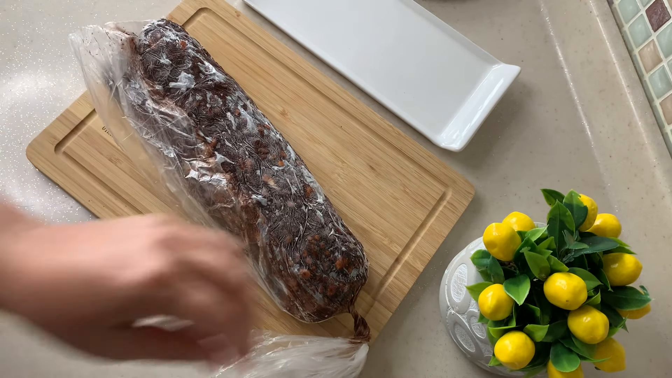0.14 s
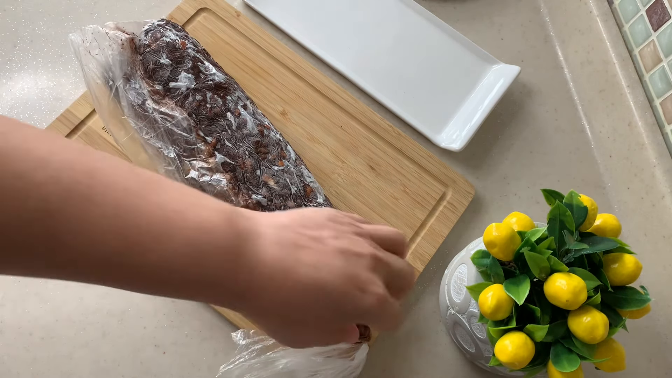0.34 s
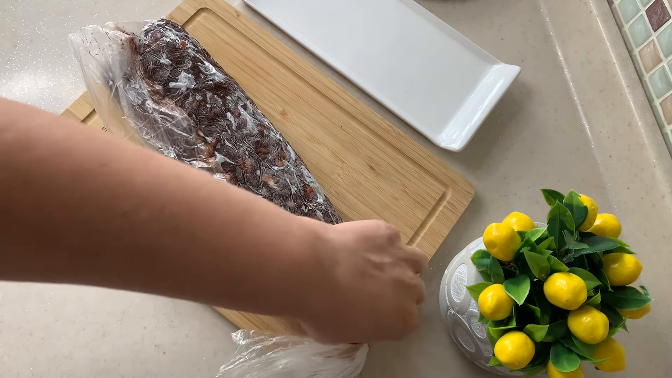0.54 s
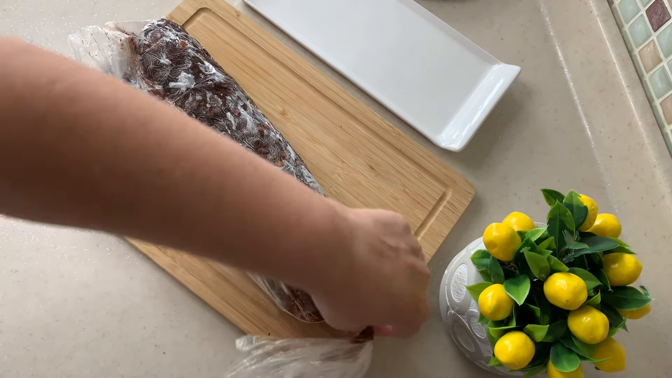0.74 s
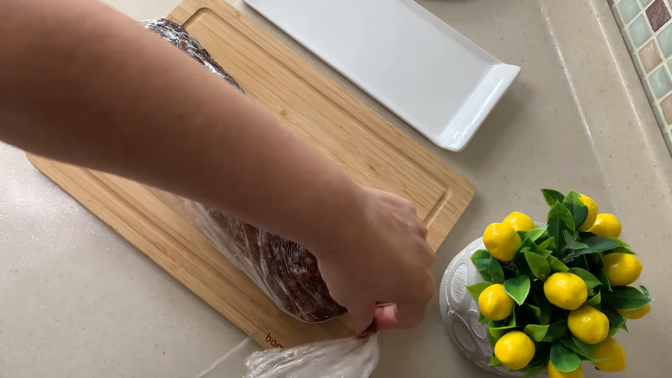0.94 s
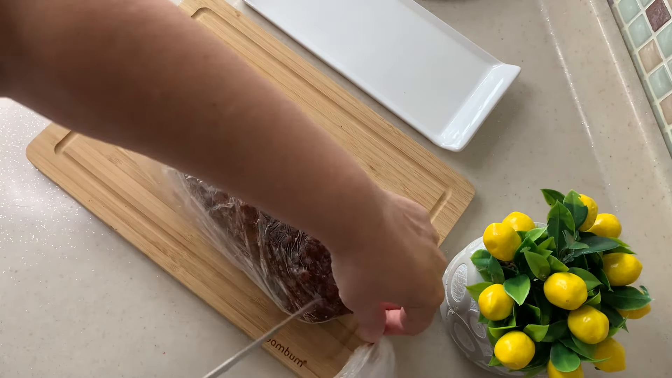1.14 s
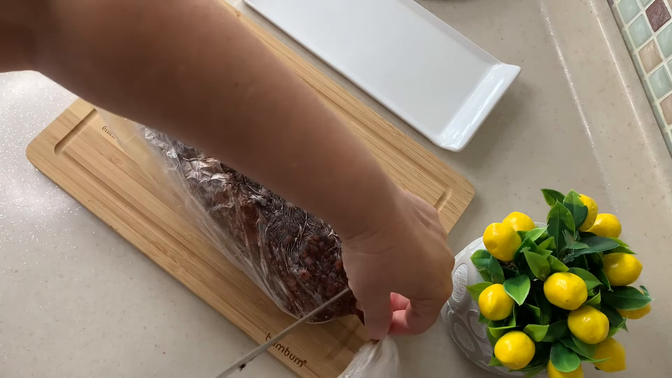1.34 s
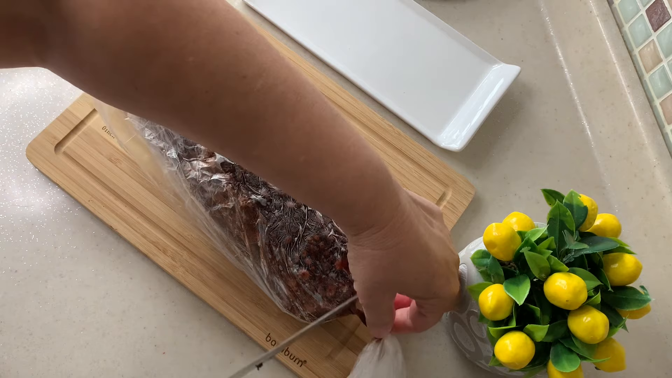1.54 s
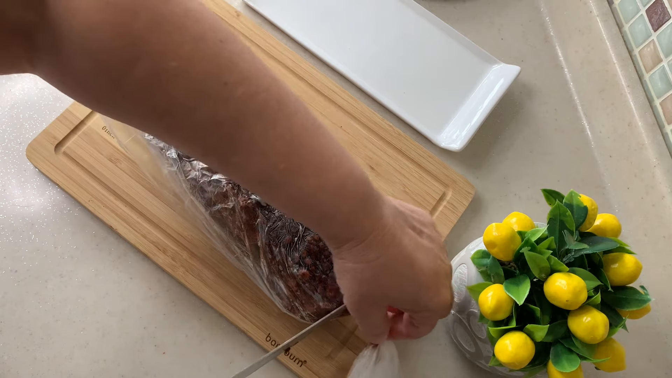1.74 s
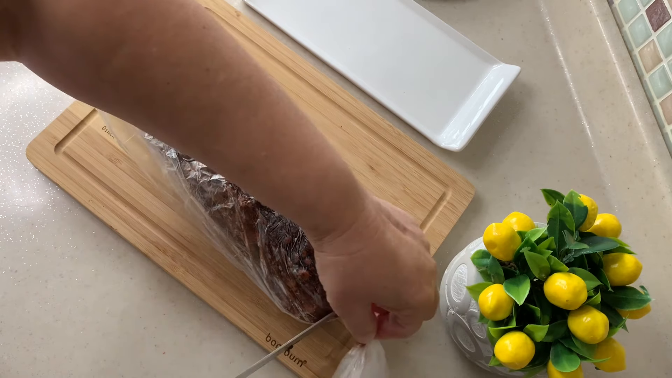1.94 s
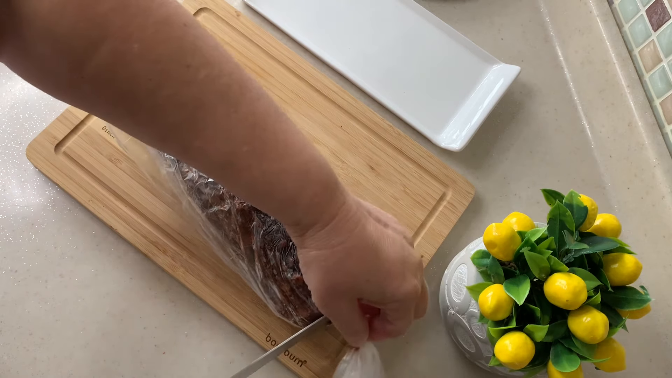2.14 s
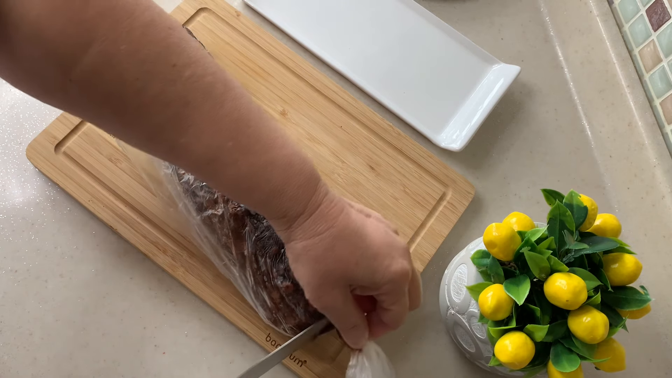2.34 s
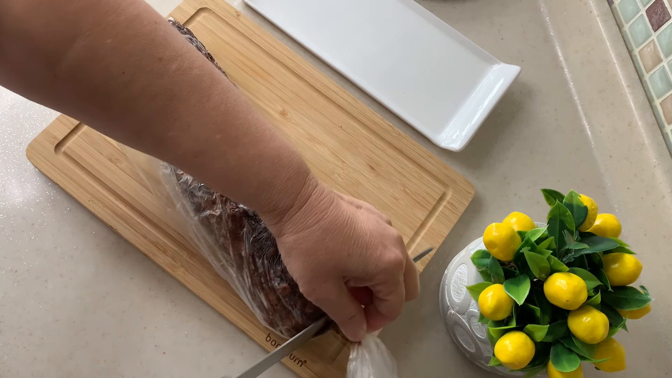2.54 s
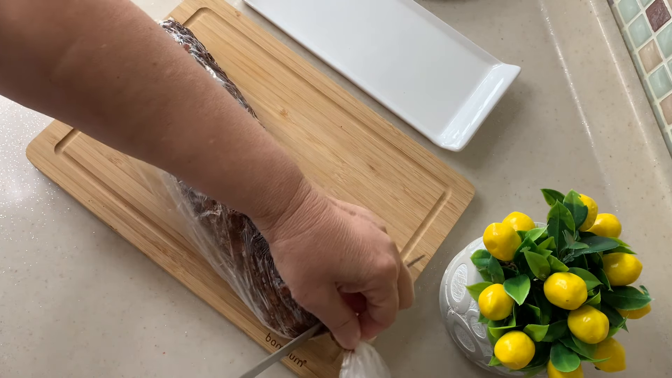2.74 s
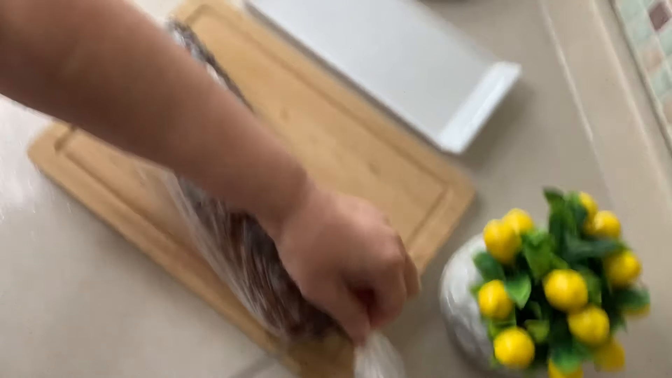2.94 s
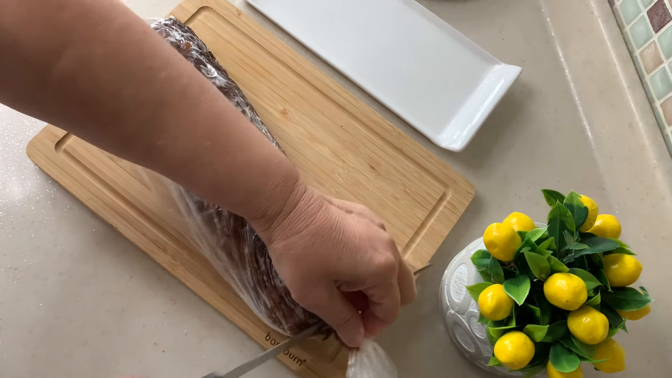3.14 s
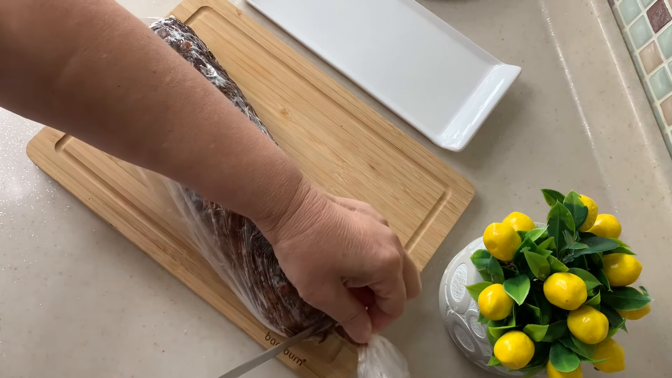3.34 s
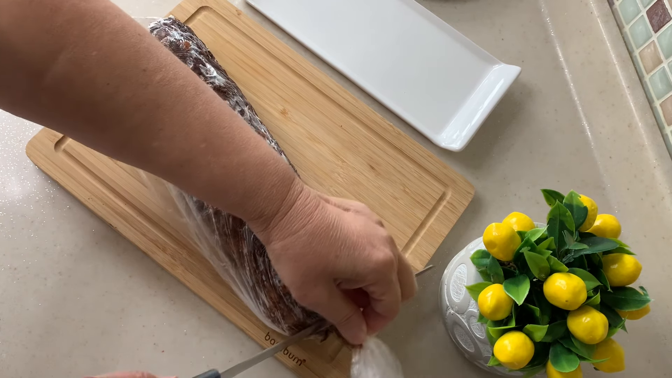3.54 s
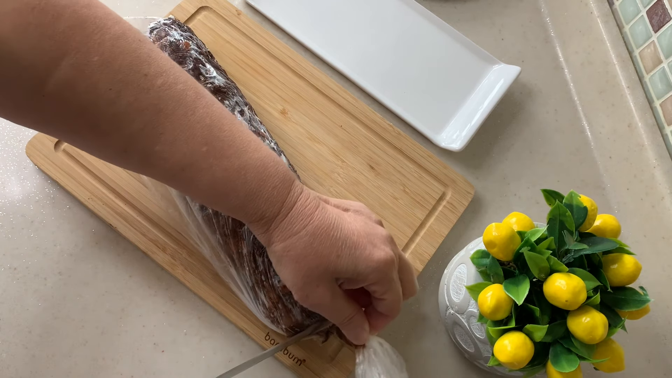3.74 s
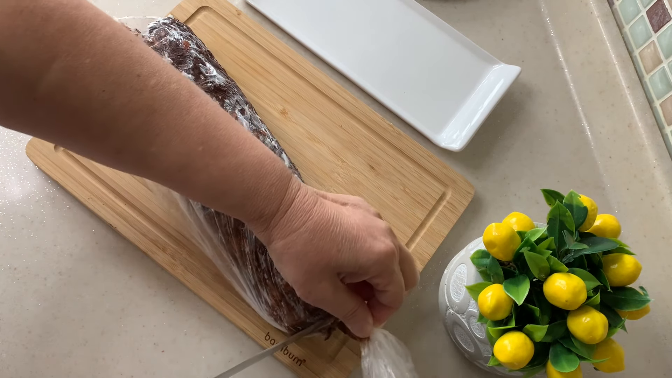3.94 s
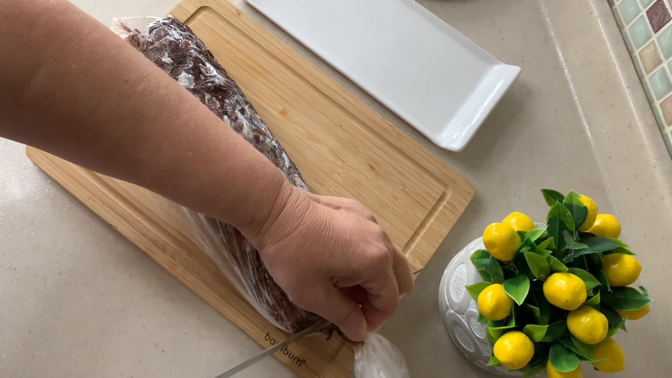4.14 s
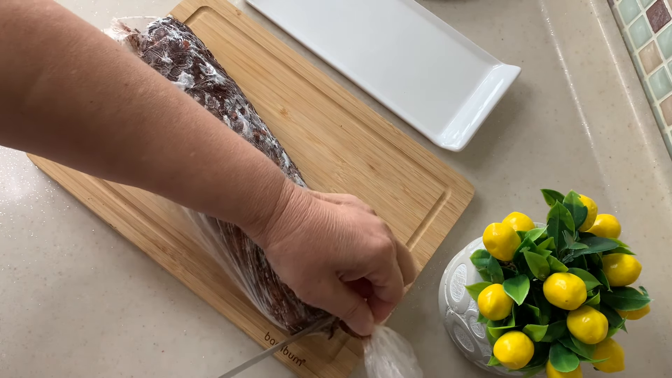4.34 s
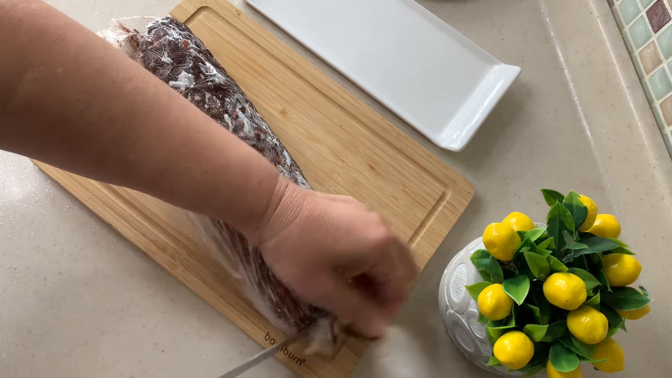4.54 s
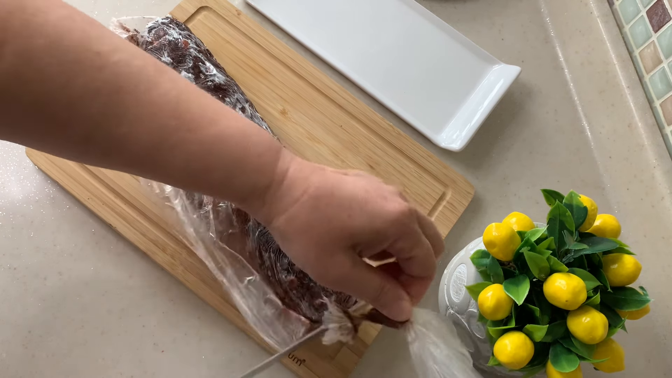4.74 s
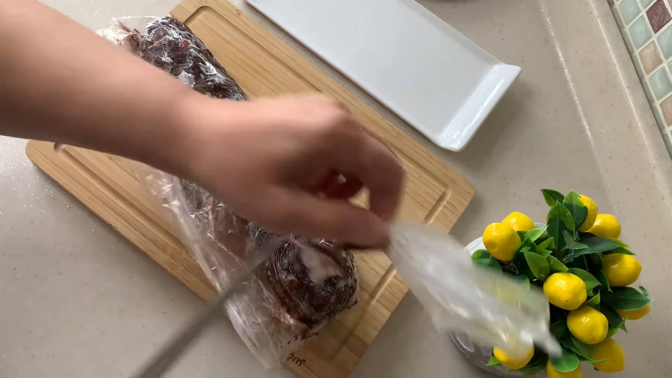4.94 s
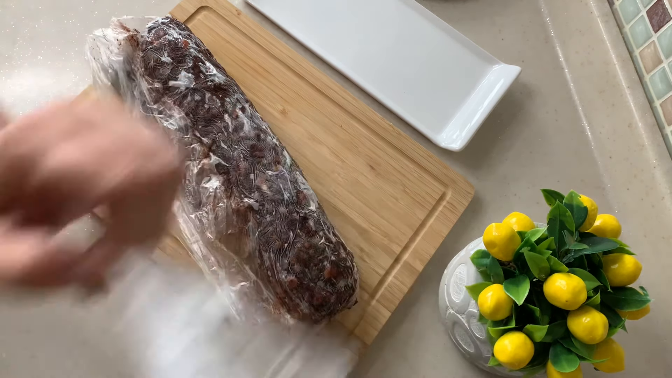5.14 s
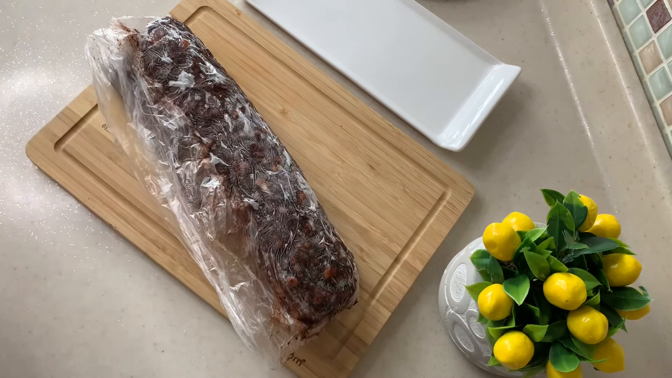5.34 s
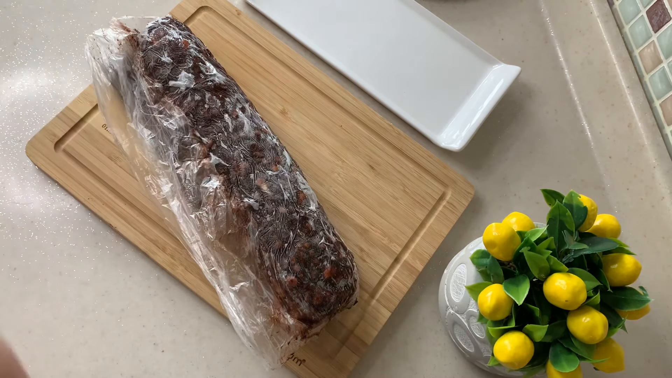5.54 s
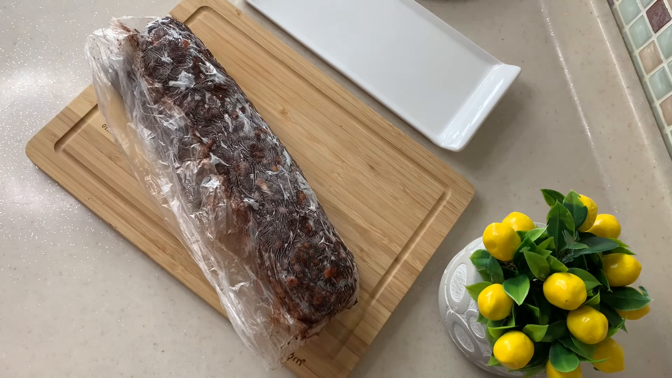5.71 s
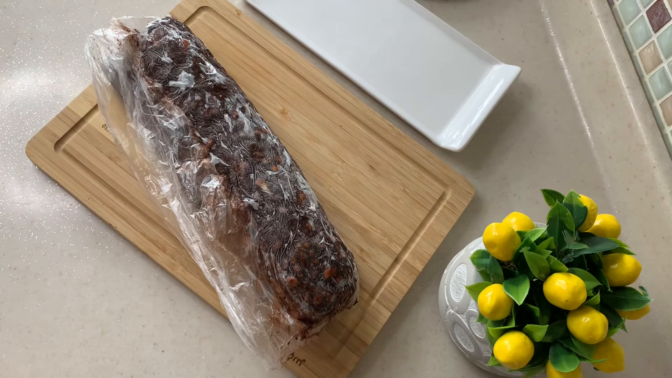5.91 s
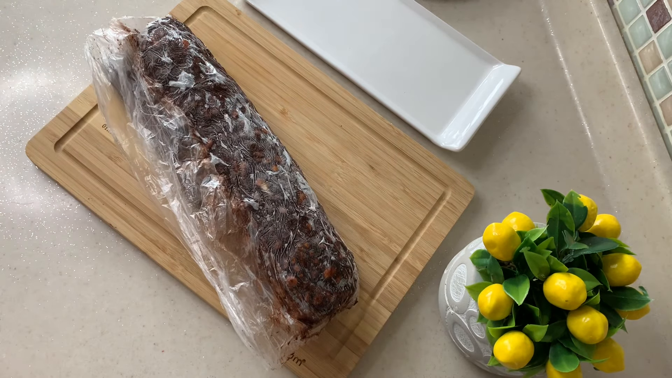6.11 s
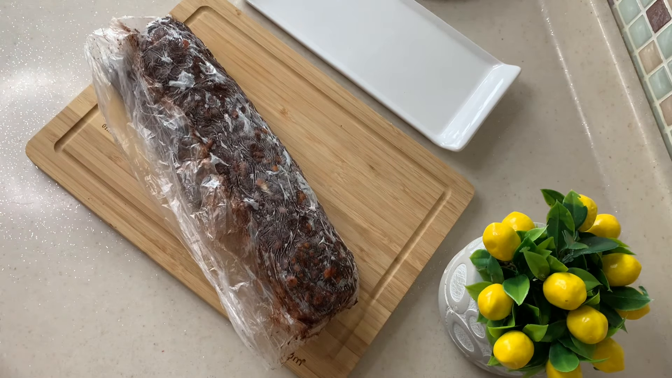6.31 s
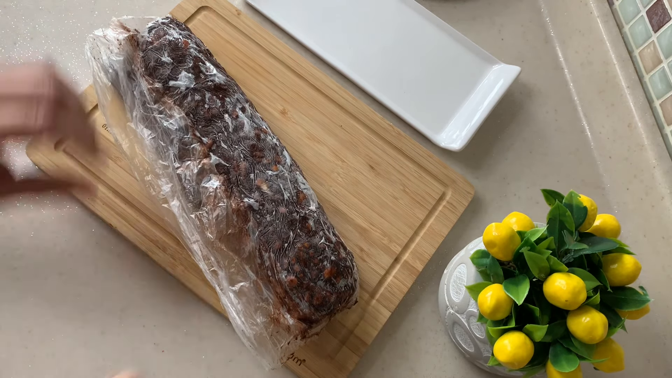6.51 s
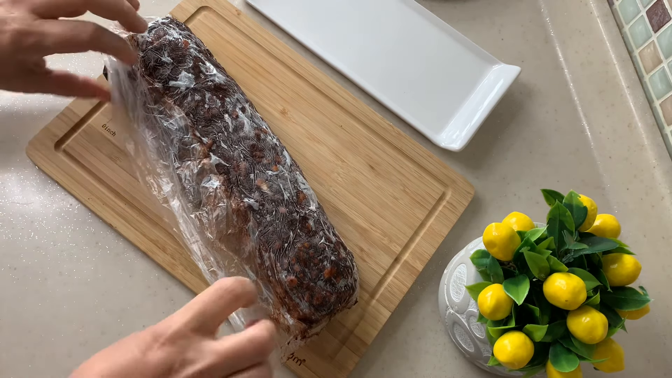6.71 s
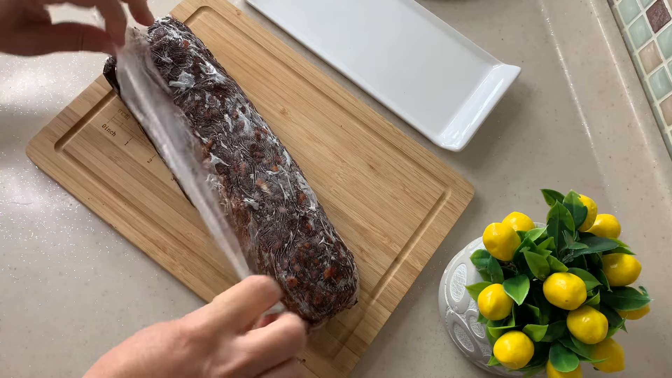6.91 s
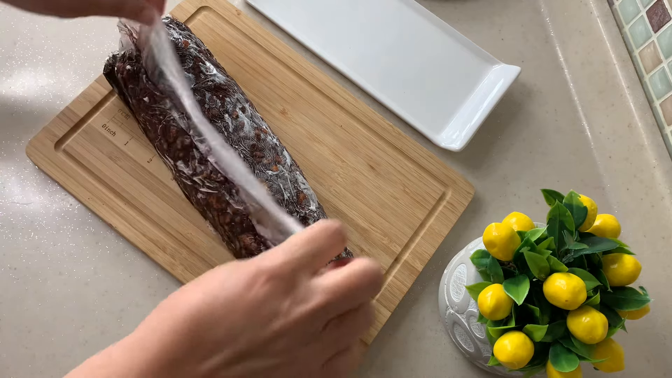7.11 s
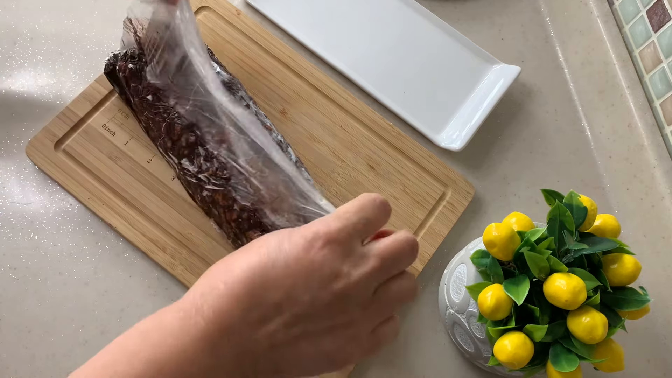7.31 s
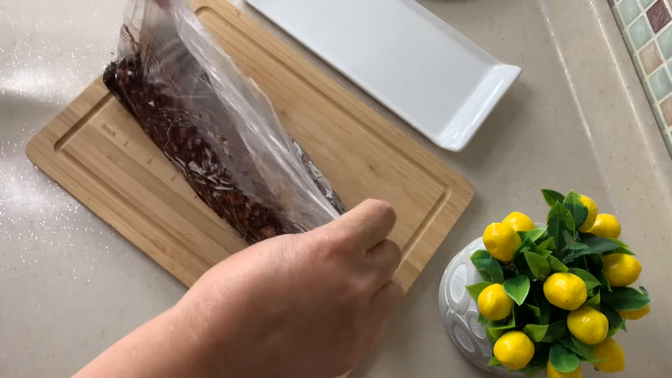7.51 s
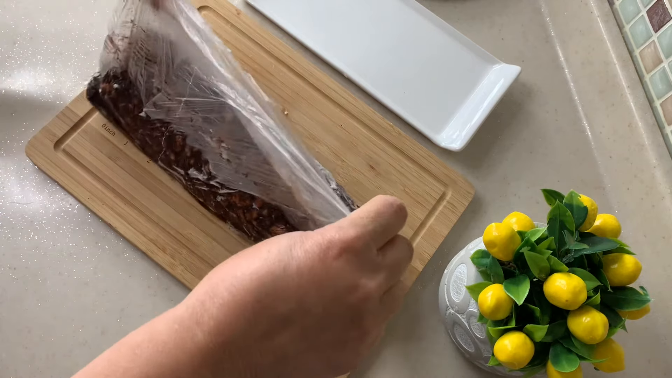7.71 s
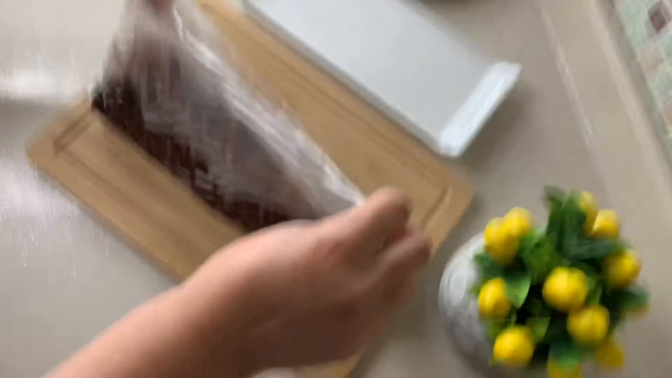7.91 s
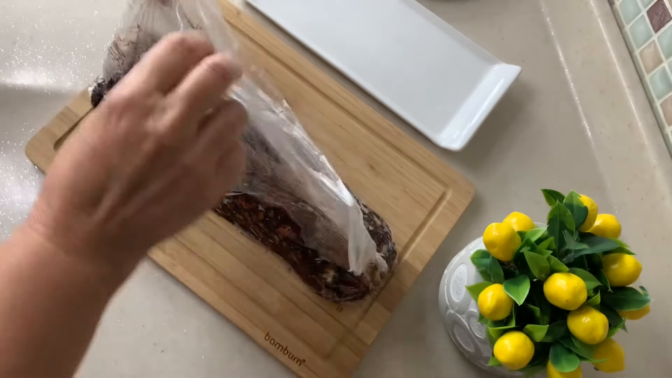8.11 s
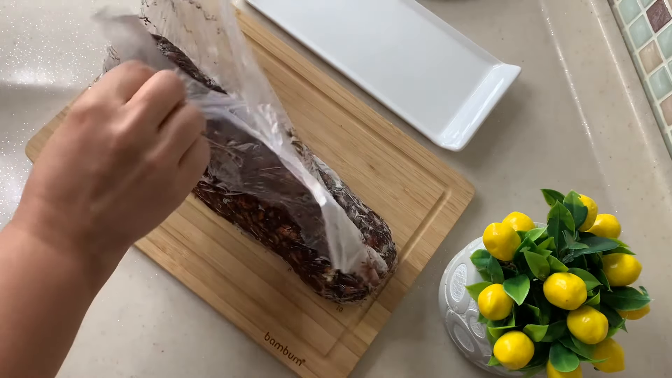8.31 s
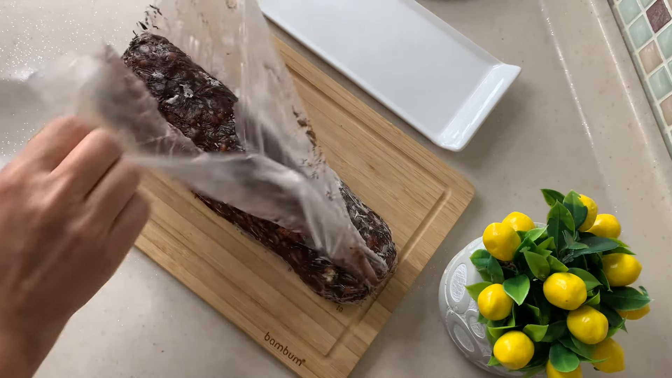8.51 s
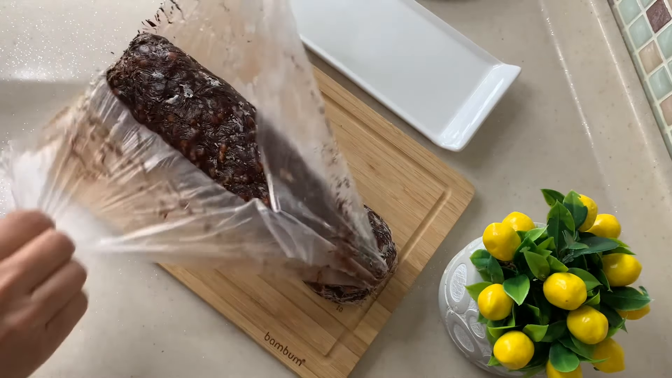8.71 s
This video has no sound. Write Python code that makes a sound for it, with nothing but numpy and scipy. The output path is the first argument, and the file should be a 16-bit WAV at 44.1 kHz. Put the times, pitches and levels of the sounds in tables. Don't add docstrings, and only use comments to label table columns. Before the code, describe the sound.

A small tiled kitchen with a soft, low ventilation hum throughout, captured close in stereo by a phone; hard walls give each sound a short tail. From 0 to 2 seconds fingers gather plastic film with faint, thin crinkles and tiny ticks. From about 2.2 to 4.5 a knife saws to and fro, roughly six soft crackly strokes a second, with dry snaps and a light board knock near 2.9. At 4.55 the blade breaks through and hits the wood with a hard, bright, ringing knock, then slight rustles until 5.3. Steel clinks on stone at 5.8 and more heavily at 6.05, with dull handle knocks and smaller settling clinks up to 6.46. From 6.7 film peels in uneven tugs, bright and much louder, dense crackle with sharp snaps, strongest around 7.0-7.9, low board thumps near 7.4 and 7.9, a brief dip near 8, then renewed crackling to the end.

```python
import sys
import numpy as np
from scipy import signal
from scipy.fft import rfft, irfft, next_fast_len
from scipy.io import wavfile
from scipy.ndimage import uniform_filter1d

SR = 44100
rng = np.random.default_rng(int(sys.argv[2]) if len(sys.argv) > 2 else 0)


def file_out(sig):
    cols = np.atleast_2d(sig).T
    lim = np.clip(cols, -1, 1)
    pcm = np.round(lim * 32767).astype(np.int16)
    wavfile.write(sys.argv[1], SR, pcm)


def undo_db(level):
    steps = np.asarray(level, float) / 20
    return 10 ** steps


N = 390715

# pitch_hz, level_db
AIR_SPECTRUM = [(30, -22.5), (70, 2), (130, 2.5), (260, -16.5), (600, -11.5), (1100, -13), (2000, -23.5),
                (3000, -25), (3700, -36.5), (7000, -40), (16000, -34.5)]
# pitch_hz, width_hz, level_db
DUCT_TONES = [(72, 20, -63), (204, 9.1, -63.5), (328, 25, -69), (411, 47, -67), (397, 12, -69),
              (584, 14, -68), (640, 99, -67)]
# start_s, length_s, level_db
GRIPS = [(-.06, 0.1, -66.5), (.07, 0.11, -64.5), (.345, 0.04, -58.5), (.55, 0.076, -64), (.66, 0.17, -59.5),
         (.97, 0.12, -59.5), (1.12, 0.11, -67.5), (1.32, 0.053, -71), (1.41, 0.062, -71.5),
         (1.6, 0.023, -72), (1.66, 0.06, -74.5), (1.78, 0.027, -66), (1.84, 0.15, -59.5), (1.99, 0.11, -56),
         (4.65, 0.087, -47.5), (4.77, 0.11, -47.5), (5.03, 0.072, -65), (5.14, 0.1, -71),
         (5.28, 0.094, -71)]
# start_s, length_s, level_db
STROKES = [(2.18, 0.093, -58), (2.25, 0.28, -54.5), (2.5, .17, -56.5), (2.66, 0.21, -51),
           (2.88, 0.14, -47.5), (3.07, 0.12, -48.5), (3.22, 0.18, -52.5), (3.385, 0.15, -50.5),
           (3.55, 0.16, -49.5), (3.71, 0.13, -51), (3.89, 0.11, -52.5), (4.03, 0.14, -52.5),
           (4.21, 0.14, -50.5), (4.35, 0.12, -50.5), (4.47, 0.16, -42.5)]
# start_s, length_s, level_db
SCUFFS = [
    (4.585, 0.29, -57.5),
    (5.45, 1, -82),
    (6.205, 0.032, -53),
    (6.3, .1, -72),
]
# start_s, length_s, level_db
PULLS = [(6.65, 0.058, -69.5), (6.72, 0.12, -48.5), (6.8, 0.27, -39), (7.08, 0.14, -36),
         (7.22, 0.15, -33.5), (7.33, 0.2, -38), (7.56, 0.058, -37), (7.62, 0.067, -36), (7.7, 0.1, -39),
         (7.86, 0.1, -42.5), (7.95, 0.16, -56), (8.155, 0.1, -41), (8.29, 0.11, -38.5), (8.4, 0.18, -33),
         (8.55, 0.26, -33), (8.7, 0.37, -39.5)]
# middle_db, low_db, lean (under 1 peaks early), steepness, overlap
GRIP_SWELL = (-2.5, -11, 1.82, 1, 0.74)
STROKE_SWELL = (-0.5, -7, 1.02, 1.92, 0.25)
PULL_SWELL = (-4, -8, 1.39, 0.84, 0.3066)
SCUFF_SWELL = (15.5, 4.5, 0.35, 1.5, 0.017)
# pitch_hz, level_db
CREASE_SPECTRUM = [(190, -10.5), (350, -5.5), (700, -5.5), (1400, -8.5), (2200, -6.5), (3500, -3),
                   (5500, -1.5), (7000, -5), (9000, 7), (12000, 2), (15500, 4)]
# start_s, peak_db, middle_db (relative)
HANDLING_SNAPS = [(1.359, -47, -6), (1.385, -48, -20), (1.484, -50, -20), (1.62, -50, -14), (1.6616, -50, -7),
                  (1.705, -50, -10), (2.197, -40, -20), (1.8517, -41.5, -20), (1.9604, -50, 8),
                  (5.0636, -43.5, -18), (5.0974, -40, -13.5), (5.0252, -50.5, -15), (5.0513, -47.5, -13.5),
                  (5.0686, -40, -18), (5.076, -44.5, -20), (5.117, -46.5, -20), (5.127, -51.5, -19.5),
                  (5.1819, -46, -20), (5.31, -47, -20), (5.2107, -47.5, -19.5), (5.303, -43.5, -13),
                  (5.7407, -37, -9), (6.333, -50, -12), (6.345, -52, -12), (6.357, -52, -20),
                  (6.368, -49, -20), (6.6705, -43.5, -9.5), (6.699, -41.5, -11), (.1491, -50, -12),
                  (.3661, -46, -12), (.6095, -51, -13), (.6374, -50, -16), (.844, -45, -16),
                  (1.0186, -49, -12), (1.1513, -49, -19), (1.9874, -45, -13), (2.0158, -43, -15),
                  (2.0712, -45, -9), (4.9972, -49, -18), (5.0377, -50, -18), (5.1117, -50, -20),
                  (5.1529, -52, -19), (5.1763, -50, -18), (5.2162, -48, -19), (5.2382, -53, -16),
                  (5.4173, -56, -12),
                  (0.3706, -40.5, -12), (1.076, -40, -8), (1.2012, -44, -16), (1.2613, -44, -23),
                 (1.4217, -46, -16), (1.7982, -43, -10.5), (2.0966, -38, -3), (2.317, -38, -16),
                 (2.379, -35, -5), (2.7237, -33, -3), (2.833, -34, -9), (2.9325, -34, -15),
                 (2.9864, -33.5, -22), (3.021, -30.5, -28), (3.12, -43, -7), (3.266, -43, -16),
                 (3.4018, -26.5, -17), (3.6326, -39, -19), (3.7305, -34.5, -25), (4.5186, -39.5, 13)]
# start_s, peak_db, middle_db (relative)
PEELING_SNAPS = [(6.76, -28.5, -7), (6.7759, -26, -21), (6.8767, -24, -17), (7.0245, -19.5, -14),
                 (7.0489, -22.5, -24), (7.1119, -13, -19), (7.146, -21.5, -25), (7.2551, -22, -18),
                 (7.2786, -16, -18), (7.294, -10, -20), (7.2905, -16, -22), (7.3347, -26.5, -18),
                 (7.359, -23, -23), (7.397, -22, -1.5), (7.66, -21, -20), (7.726, -25, -21),
                 (7.8296, -26, -20), (7.9017, -32.5, -20), (8.135, -44, -18), (8.1678, -30, -23),
                 (8.394, -22, -22), (8.438, -27.5, -23), (8.556, -20, -20), (8.568, -18, -18),
                 (8.583, -18, -16), (8.6524, -23, -20), (8.7195, -27, -16), (8.758, -21, -17),
                 (8.833, -20, -20), (7.4113, -17.5, -9.5), (7.5915, -15, -25), (7.594, -14, -20),
                 (7.6435, -25, -25), (7.647, -20, -25), (7.645, -20.5, -32), (7.7023, -26, -32),
                 (7.7475, -19, -20), (7.772, -23.5, -31), (7.7979, -21, -14), (7.8418, -18.5, -16),
                 (8.1575, -38, -18), (8.5053, -15, -23), (6.7273, -39, -14), (7.012, -26, -8),
                 (7.6015, -21, -20), (7.6745, -21, -20), (7.737, -22, -19), (7.8019, -16, -23),
                 (7.812, -25, -20), (8.2082, -26, -17), (8.315, -28, -16), (8.481, -21, -18),
                 (8.5095, -20, -20), (8.526, -21, -20), (8.576, -19, -18), (8.633, -23, -18)]
# start_s, peak_db, brightness_db
CHOPS = [(0.371, -47, 4), (2.9333, -30, -11.5), (2.985, -46, -8.5), (3.011, -43, -20), (4.546, -40, 11.5),
         (4.5505, -31, 15), (4.5545, -21, 10), (4.558, -12.5, 8.5), (4.5613, -18.5, -19),
         (4.5657, -19.5, 1), (4.5701, -18.5, -10), (7.022, -30.5, 8.5), (7.1117, -26.5, 10),
         (7.5903, -35, -18), (7.663, -35.5, -15)]
# pitch_hz, level_db, t60_s
BOARD_MODES = [(146, 21.5, 0.28), (187.6, -21.5, 0.17), (348, 3, 0.14), (435, -3, 0.23), (691, 10.5, 0.068),
               (1001, 0, 0.073), (1300, -15.5, 0.023), (1780, -8.5, 0.027), (2073, -2.5, 0.09),
               (2592, 11, 0.14), (3420, -7, 0.12), (4485, -18.5, 0.047), (6530, -38, 0.018)]
# start_s, peak_db, pitch_hz, t60_s
THUMPS = [(2.9523, -41, 76, 0.32), (2.9668, -32.5, 76, 0.19), (2.995, -45, 77, 0.25),
          (3.0065, -32, 76, 0.18), (4.564, -50, 108, 0.31), (4.564, -17, 185, 0.04),
          (6.055, -46, 110, 0.69), (6.056, -35, 328, 0.052), (6.2, -36.5, 61.5, 0.12),
          (6.31, -44, 57.3, 0.74), (6.999, -49, 111, 0.14), (7.429, -22, 83.4, 0.1),
          (7.484, -31.5, 72, 0.13), (7.903, -23, 126.3, 0.14), (7.922, -15, 58.4, 0.098),
          (7.99, -24, 50.4, 0.04), (8.62, -43, 62, 0.28), (8.75, -48, 55.4, 0.17), (8.03, -35, 70, 0.39)]
# start_s, peak_db,
# pitch_hz, t60_s
KNOCKS = [(0.38, -44, 316, 0.1), (2.9333, -28, 1700, 0.014), (2.9335, -29, 2600, 0.014),
          (2.942, -38, 940, .015), (2.983, -42, 2500, 0.018), (3.011, -36, 2400, 0.012),
          (4.561, -35, 11900, .1), (4.5617, -18.5, 1600, 0.018), (3.008, -34.5, 400, 0.036),
          (4.56, -21, 1044, 0.06), (4.563, -30, 484, 0.055), (4.565, -27, 1300, .05),
          (4.572, -27, 1965, .06), (4.558, -19.5, 2450, .04), (4.564, -24, 4700, 0.057),
          (6.052, -34.5, 560, 0.067), (4.7, -40, 330, .1), (4.5615, -9, 3600, 0.018),
          (4.562, -35, 314, 0.18), (6.076, -32, 349, 0.2), (6.213, -33.5, 310, 0.081),
          (6.33, -37, 434, .05), (6.345, -41, 250, 0.089), (6.409, -38, 530, .05),
          (6.426, -45, 1500, 0.025), (7.596, -32.5, 360, 0.07), (7.665, -42, 440, .05),
          (6.248, -38, 380, 0.11), (7.295, -40, 600, 0.1), (6.404, -41, 1100, .04),
          (6.447, -32.5, 760, 0.06), (6.3313, -46, 3470, 0.02), (6.452, -35, 1900, 0.038),
          (5.8, -39, 2300, .06), (5.796, -43, 1600, .04), (5.832, -41, 1700, .05), (6.396, -43, 1500, .04),
          (6.3925, -28.5, 750, 0.04), (6.3941, -42, 3300, .015), (6.3945, -44, 6600, .015),
          (6.4036, -40, 6560, .018), (6.404, -43, 3400, .025), (6.4, -34, 900, .04),
          (0.372, -50, 560, 0.062), (7.36, -40, 620, .08), (7.12, -35, 590, .07)]
# start_s, peak_db, knock_db (relative), blade_share (0 tip - 1 handle end)
CLINKS = [(5.7946, -12, -26, 0.01), (5.8021, -13.5, -28, .01), (5.81, -29, -11, .05),
          (5.853, -31, -12, .05), (5.8306, -17, -17.5, 0.049), (6.0212, -36, -8, 0.5),
          (6.042, -38.5, 13, 0.88), (6.0466, -11.5, -14.5, 1), (6.0508, -9.5, -21, 1),
          (6.0543, -12.5, -30, 0.57), (6.065, -17, -18, 0.87), (6.0687, -18, -20, 0.35),
          (6.0795, -19.5, -18, 0.69), (6.096, -29.5, -15, 0.56), (6.2088, -46, 7, 0.34),
          (6.215, -38, 2, .4), (6.221, -57, 11, 0.42), (6.335, -46, 3, 0.62), (6.3932, -42, 7, 0.47),
          (6.4038, -35, 3, 0.21), (6.4505, -22, -3, 0.99), (6.455, -18, -9.5, 0.81), (6.463, -24, -10, .9)]
# pitch_hz, level_db, t60_s
TIP_MODES = [(2568, 7.5, 0.05), (2960, 7, 0.051), (3460, 10.5, 0.049), (4114, 12, 0.077), (5800, -3, 0.06),
             (6330, -3.5, .05), (9850, 13.5, 0.08), (11900, -4, 0.065), (11000, 12, 0.06), (12550, 7, 0.07),
             (15400, -3, 0.06), (15640, -8.5, 0.044)]
# pitch_hz, level_db, t60_s
BLADE_MODES = [(1760, 3, 0.06), (2840, -3.5, 0.074), (4210, 4, 0.1), (3710, 0, 0.06), (5000, -5, 0.06),
               (5670, 6, 0.07), (6000, 3, .06), (6730, 8.5, 0.063), (9860, 12, 0.086), (10400, 8.5, 0.088),
               (12900, 11.5, 0.14), (11800, 17, 0.062), (14500, 2, 0.07), (14800, 8.5, 0.064)]
# pitch_hz, t60_s
KITCHEN_DECAY = [(100, 0.64), (500, 0.44), (1500, 1), (4000, 0.52), (9000, 0.42), (16000, 0.28)]
# pitch_hz, likeness (0 - 1)
LIKENESS = [(60, .9), (200, .8), (400, .3), (1800, .1), (4500, .12), (7000, .5), (7800, .985), (16000, .97)]
# pitch_hz, likeness (0 - 1)
PEELING_LIKENESS = [(60, .9), (200, .8), (400, .3), (1800, .3), (2800, .44), (4500, .15), (7000, .5),
                    (7800, .975), (16000, .96)]
# pitch_hz, lag_cycles
LEFT_LAG = [(0, -.14), (500, -.3), (1200, .1), (2800, .5), (4200, 1), (5200, 1.5), (6500, 2), (7400, 2.31),
            (8500, 2.5), (11100, 3), (13400, 3.5), (15900, 4)]
# pitch_hz, level_db
BALANCE = [(100, -2), (400, 0.5), (1200, 1), (3500, -1), (5600, -6.5), (6800, 2.5), (16000, .3)]
PHONE_LIMITS = [45, 16050]


def evened(x):
    return x / np.sqrt(np.mean(x ** 2) + 1e-20)


def read(points, hz):
    f, value = np.transpose(points)
    return np.interp(np.log(hz + 1), np.log(f + 1), value)


def add(mix, s, sound):
    part = mix[round(s * SR):][:len(sound)]
    part += sound[:len(part)]


def band(x, lo_hz, hi_hz):
    return signal.sosfilt(signal.butter(2, [lo_hz, hi_hz], "bandpass", fs=SR, output="sos"), x)


def puff(t60, rise_s, count=1):
    t = np.arange(1500) / SR
    envelope = undo_db(-60 * t / t60) * (1 - np.exp(-t / rise_s))
    return np.squeeze(rng.standard_normal((count, len(t))) * envelope)


def chatter(count, length):
    noise = rng.standard_normal((count, length))
    waver = evened(uniform_filter1d(uniform_filter1d(noise, 50, 1), 50, 1))
    return 1 + .9 * waver * np.minimum(np.arange(length) / 200, 1)


def ring(modes, detune, longest_s):
    t = np.arange(SR // 11) / SR
    hz, db, t60 = np.transpose(modes)[:, :, None]
    level_luck, pitch_luck, phase = rng.standard_normal((3, len(modes), 1))
    fading = undo_db(db + 3 * level_luck - 60 * t / np.clip(t60, .005, longest_s))
    tones = np.sin(2 * np.pi * hz * (1 + detune * pitch_luck) * t + phase)
    out = (fading * chatter(len(modes), len(t)) * tones).sum(0)
    return out / abs(out).max()


def air():
    frames, hz = N // 512 + 5, np.fft.rfftfreq(2048, 1 / SR)
    a, b, c, d, patches = rng.standard_normal((frames, 1025, 5)).T
    patches = evened(uniform_filter1d(uniform_filter1d(patches, 12, 0), 8, 1))
    shape = undo_db(read(AIR_SPECTRUM, hz))
    shape *= undo_db(-55) / np.linalg.norm(shape)
    for f, width, db in DUCT_TONES:
        line = 1 / (1 + (2 * (hz - f) / width) ** 2)
        shape = np.hypot(shape, undo_db(db) * line / np.linalg.norm(line))
    z = np.array([a + 1j * b, c + 1j * d]) * (shape[:, None] * undo_db(1.9 * patches))
    noise = signal.istft(z, nperseg=2048, noverlap=1536)[1][:, :N]
    return np.linalg.norm(shape) * evened(noise)


def handling():
    t = np.arange(0, N, 32) / SR
    power = np.full((3, len(t)), 1e-12)
    movements = ((GRIPS, GRIP_SWELL), (STROKES, STROKE_SWELL), (PULLS, PULL_SWELL), (SCUFFS, SCUFF_SWELL))
    for moves, (middle_db, low_db, lean, steep, overlap) in movements:
        for start, length, db in moves:
            u = ((t - start) / length + overlap) / (1 + 2 * overlap)
            on = (u > 0) & (u < 1)
            speed = np.sin(np.pi * u[on] ** lean) ** max(steep, 1)
            power[:, on] += (speed * undo_db(db + np.array([[0], [middle_db], [low_db]]))) ** 2
    return [np.interp(np.arange(N) / SR, t, 10 * np.log10(p)) for p in power]


def drift(depth_db):
    knots = undo_db(depth_db * rng.standard_normal(N // 3500 + 2))
    return np.interp(np.arange(N) / 3500, np.arange(len(knots)), knots)


def film():
    out = np.zeros(N)
    high_db, middle_db, low_db = handling()
    high, middle, low = undo_db(high_db), undo_db(middle_db), undo_db(low_db)
    clumps_db = sum(1.1 * evened(uniform_filter1d(rng.standard_normal(N), size)) for size in (160, 900))
    pops = np.zeros(N)
    pops[rng.integers(0, N, 2500)] = undo_db(3.85 * np.minimum(rng.exponential(1, 2500), 4) - 1.0)
    pops *= undo_db(-.35 * np.clip(high_db + 62, 0, 30))
    for hz in np.geomspace(190, 15500, num=24):
        cycles = np.arange(int(6 * SR / hz) + 12) * hz / SR
        grain = np.sin(2 * np.pi * cycles) * cycles * np.exp(-cycles / 1.09)
        train = np.zeros(N)
        sizes = undo_db(3.0 * np.minimum(rng.exponential(1, 16000), 5))
        train[rng.integers(0, N, 16000)] = sizes * rng.choice([-1., 1.], 16000)
        flips = evened(signal.oaconvolve(train + pops, grain)[:N])
        swell = high if hz > 7000 else middle if hz > 1600 else low
        out += flips * undo_db(read(CREASE_SPECTRUM, hz) - 6.5) * drift(1.0) * swell
    return out * evened(undo_db(clumps_db))


def snaps():
    out = np.zeros(N)
    s, db, middle_db = np.transpose(HANDLING_SNAPS + PEELING_SNAPS)[:, :, None]
    count = len(s)
    t60 = 0.02 * undo_db(0.1 * (db + 14.0))
    burst = band(puff(0.0045, 0.0003, count), 8000, 18000)
    burst += undo_db(-8.0) * band(puff(t60, 0.0015, count), 7000, 15100)
    burst += undo_db(middle_db - 1.5) * band(puff(2.4 * t60, 0.0045, count), 900, 6000)
    burst *= undo_db(db + 0.6) / abs(burst).max(1, keepdims=True)
    for start, one in zip(s[:, 0], burst):
        add(out, start, one)
    return out


def board():
    chops, thumps = np.zeros(N), np.zeros(N)
    for s, db, bright_db in CHOPS:
        add(chops, s, undo_db(db - 1.5) * ring(BOARD_MODES, .03, .06))
        add(chops, s, undo_db(db + 6.5) * band(band(puff(0.042, 0.0004), 400, 2800), 240, 2900))
        add(chops, s, undo_db(db + bright_db) * band(puff(.03, .0006), 2600, 8000))
    t = np.arange(SR // 3) / SR
    for s, db, hz, t60 in THUMPS:
        envelope = undo_db(db - 60 * t / t60) * (1 - np.exp(-t / 0.00068))
        add(thumps, s, envelope * np.sin(2 * np.pi * hz * t))
    return chops, thumps


def knocks():
    out, t = np.zeros(N), np.arange(SR // 6) / SR
    for s, db, hz, t60 in KNOCKS:
        envelope = undo_db(db - 60 * t / t60) * (1 - np.exp(-t / 0.0007))
        add(out, s, envelope * chatter(1, len(t))[0] * np.sin(2 * np.pi * hz * t))
    return out


def knife():
    out = np.zeros(N)
    for s, db, knock_db, share in CLINKS:
        share = np.clip(share, 0, 1)
        steel = (1 - share) * ring(TIP_MODES, .02, .06) + share * ring(BLADE_MODES, .015, .09)
        onset = 1 - np.exp(-np.arange(len(steel)) / 40.)
        add(out, s, undo_db(db - 6.5) * steel * onset)
        add(out, s, undo_db(db + knock_db) * 3 * band(puff(0.087, 0.003), 150, 673))
        add(out, s, undo_db(db - 3.0) * band(puff(0.023, 0.00055), 3100, 21000))
    return out


def echoes(start, length, t60_scale):
    taps = np.zeros((2, length))
    at = np.arange(start, length - 20, 20)
    at = at + rng.integers(0, 20, (2, len(at)))
    np.put_along_axis(taps, at, rng.choice([-1., 1.], at.shape), 1)
    hz, t, z = signal.stft(taps, SR, nperseg=128)
    decay = undo_db(-60 * t / (t60_scale * read(KITCHEN_DECAY, hz)[:, None]))
    tail = signal.istft(z * decay, SR, nperseg=128)[1][:, :length]
    return tail / np.linalg.norm(tail[0])


def scene():
    background = air()
    crackle, folds = film(), snaps()
    chops, thumps = board()
    near = crackle + folds + chops + knocks() + knife()
    out = near * undo_db([[-13.0], [-1.0]])
    out += thumps + background
    tail = echoes(200, SR * 2 // 3, 0.76)
    out += undo_db(-7.5) * signal.fftconvolve(near[None], tail, axes=1)[:, :N]
    turn = 2 * np.pi * 1.3 * np.arange(N) / SR
    for k in range(3):
        facing = np.sqrt(2 / 3) * np.cos(turn + k * np.pi / 3)
        source = (near - .4 * folds) * facing
        scatter = signal.oaconvolve(source[None], echoes(20, 2048, .075), axes=1)[:, :N]
        out += undo_db([[-2.5], [-11.0]]) * scatter
    return out


def prune(x, under_db, whim_db):
    x = np.pad(x, ((0, 0), (664, 0)))
    sum_difference = np.array([x[0] + x[1], x[0] - x[1]]) / 2
    z = signal.stft(sum_difference, window="cosine", nperseg=2048, noverlap=1024)[2]
    power = (abs(z[:, :1024]) ** 2).reshape(2, 128, 8, -1).mean(2)
    power[:, 12:] = np.repeat(power[:, 12:].reshape(2, 58, 2, -1).mean(2), 2, axis=1)
    total = power[:, 12:].sum((0, 1))
    steady = total < 5 * np.roll(total, 1)
    whim = evened(uniform_filter1d(rng.standard_normal((64, len(total))), 2, 1))
    whim = np.repeat(whim, 2, axis=0)
    loud_db = 10 * np.log10(total / np.median(total))
    margin_db = under_db + .03 * loud_db - np.linspace(-1.5, 1.5, 128)[:, None]
    margin_db[42:] -= 3 * signal.lfilter([1], [1, -.7], total > 12 * np.roll(total, 2))
    treble_db = 10 * np.log10(power[:, 54:76].mean((0, 1)) / power[:, 13:22].mean((0, 1)))
    margin_db[12:42] -= .72 * np.clip(treble_db - 1, -5, 8)
    needed_db = np.maximum(margin_db + whim_db * whim, 1)
    weak = (power < power[::-1] / undo_db(2 * needed_db)) & steady
    weak[:, :12] = False
    z[:, :1024][np.repeat(weak, 8, axis=1)] = 0
    mid, side = signal.istft(z, window="cosine", nperseg=2048, noverlap=1024)[1][:, 664:N + 664]
    return np.array([mid + side, mid - side])


def band_limit(x):
    return signal.sosfilt(signal.butter(12, 17100, fs=SR, output="sos"), x)


def record(dry):
    size = next_fast_len(N)
    hz = np.fft.rfftfreq(size, 1 / SR)
    other, right = rfft(dry, size)
    same = np.clip([read(LIKENESS, hz), read(PEELING_LIKENESS, hz)], 0, .995)
    late = np.exp(-2j * np.pi * np.interp(hz, *np.transpose(LEFT_LAG)))
    lean = undo_db(read(BALANCE, hz) / 2)
    low_hz, high_hz = PHONE_LIMITS
    passed = (hz < high_hz) / np.sqrt(1 + (low_hz / (hz + 1)) ** 12)
    left = same * late * right + np.sqrt(1 - same ** 2) * other
    aside, under = irfft(passed * lean * left, size)[:, :N]
    peel_from_s = 6.65
    peel = np.clip((np.arange(N) / SR - peel_from_s) * 10, 0, 1)
    x = np.clip([aside + peel * (under - aside), irfft(passed * right / lean, size)[:N]], -1, 1)
    x = prune(x, under_db=6.0, whim_db=3.6)
    return band_limit(x)


dry = scene()
out = record(dry)
file_out(out)
```